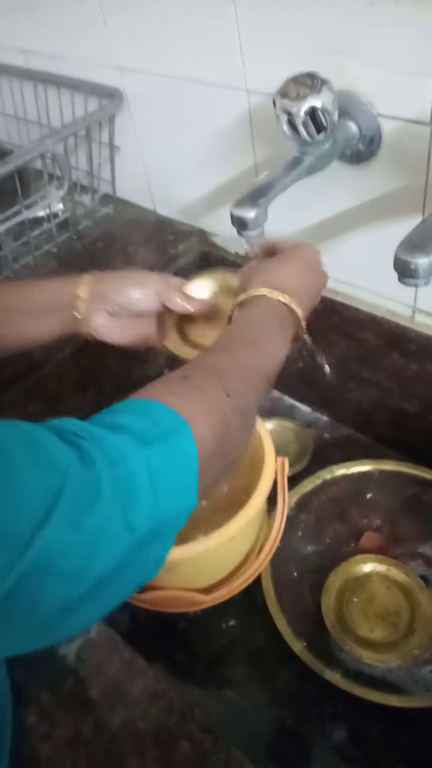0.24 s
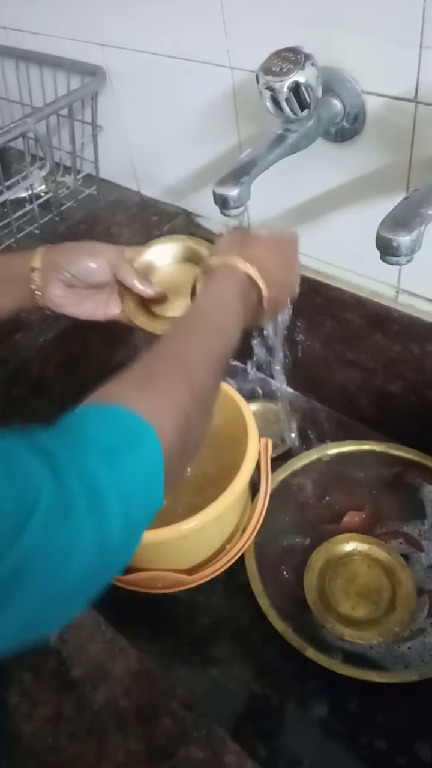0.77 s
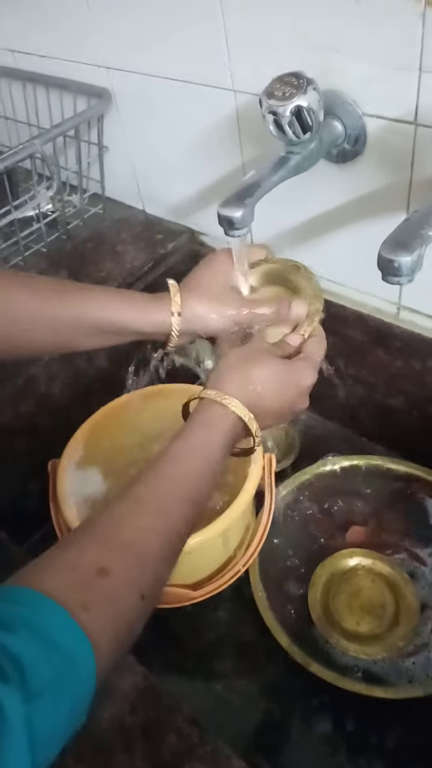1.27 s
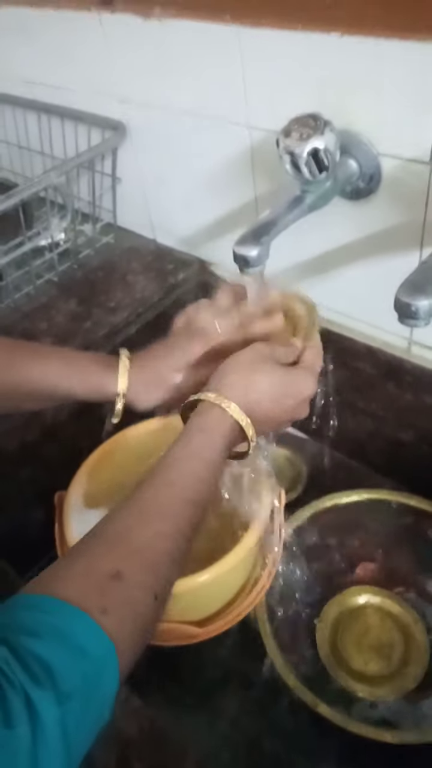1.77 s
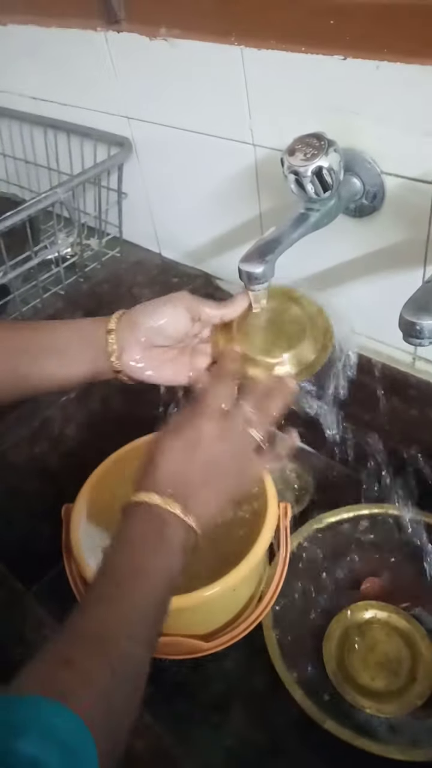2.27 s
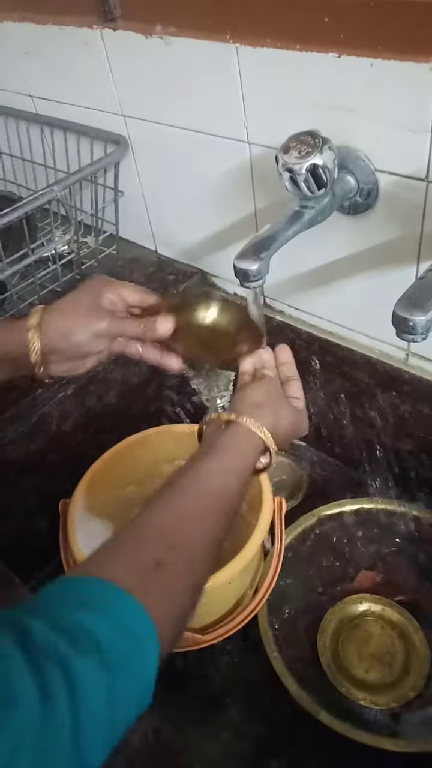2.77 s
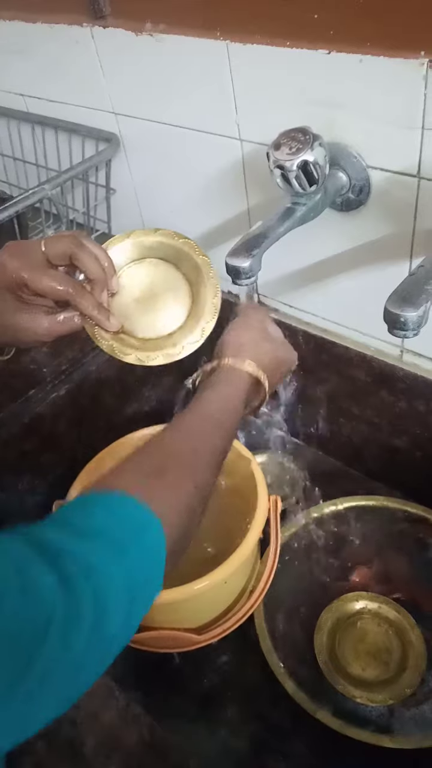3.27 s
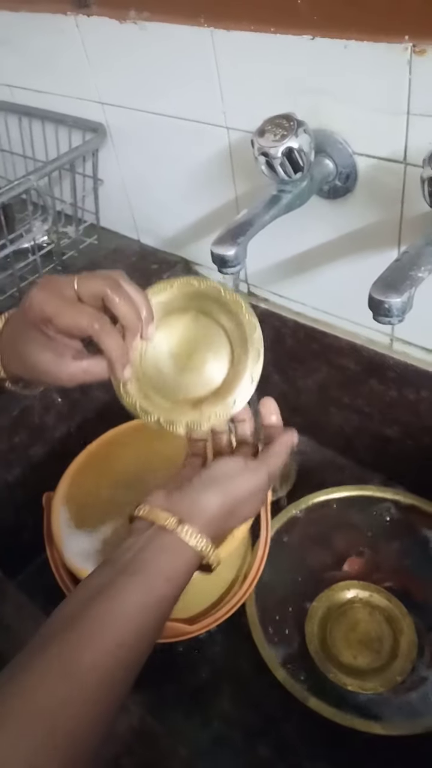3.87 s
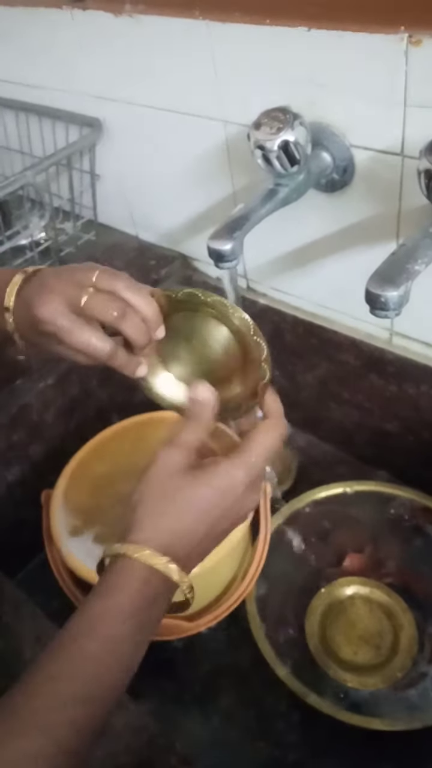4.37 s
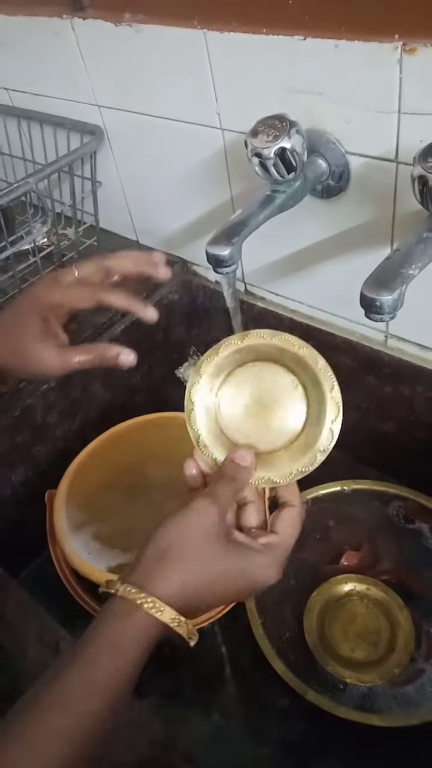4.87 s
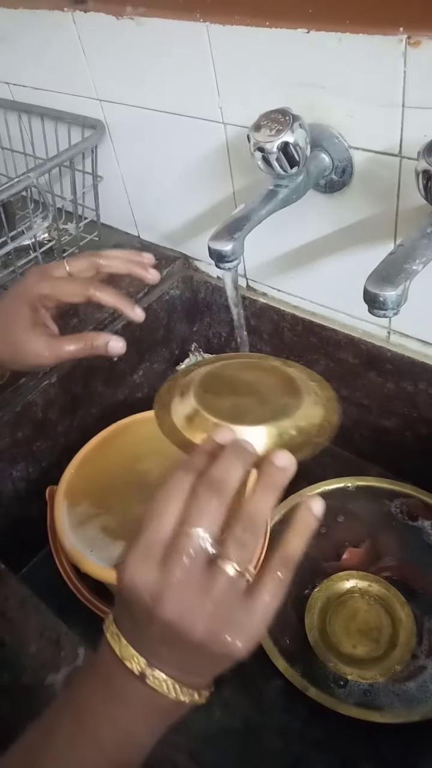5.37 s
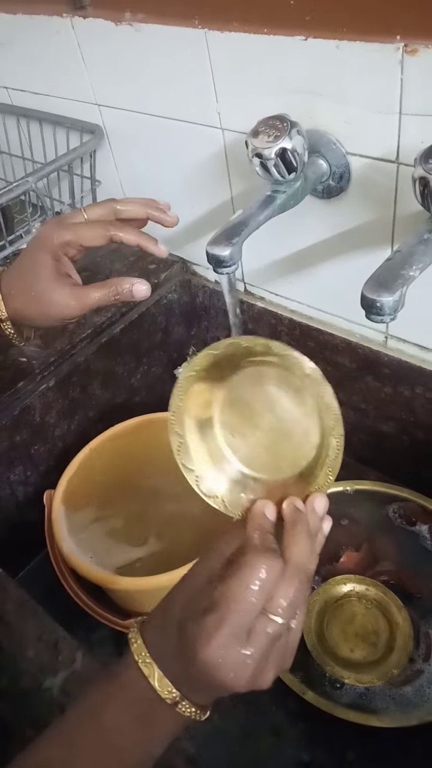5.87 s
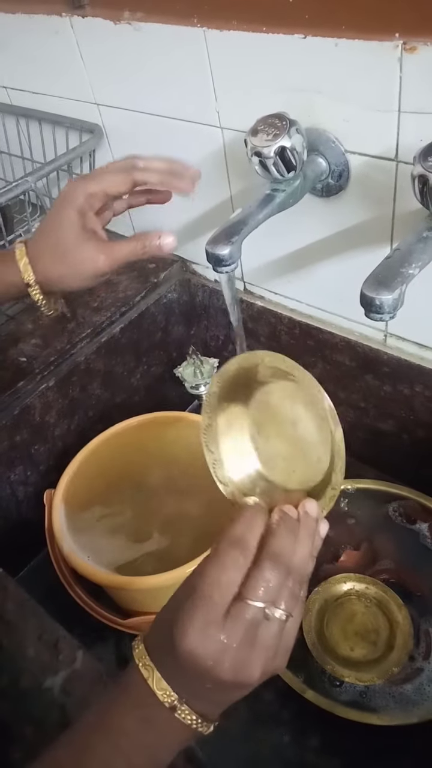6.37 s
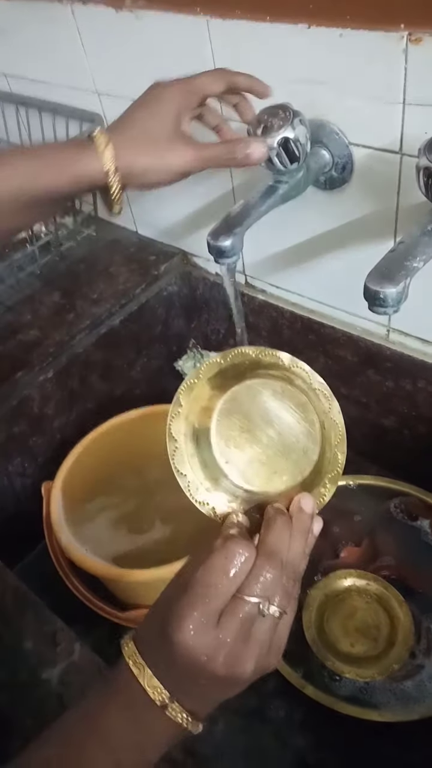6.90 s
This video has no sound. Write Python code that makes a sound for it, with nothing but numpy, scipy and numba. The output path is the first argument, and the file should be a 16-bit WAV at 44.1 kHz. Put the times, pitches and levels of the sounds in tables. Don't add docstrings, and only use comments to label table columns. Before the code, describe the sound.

Close in a small tiled kitchen, tap water runs over hands and a little brass plate into a stone sink. It opens with lively splashing; around 0.2-0.4 s come bubbly plops, a gush and a dull hollow knock. From 0.5 to 2 s the patter flutters, with crisp slaps near 0.6, 1.2, 1.5-1.6 and 1.9-2.1 s. Splashing thickens from 2.2 to 3.1 s, with spits and gurgling, then peaks around 3.4-3.7 s in hard, bright smacks and quick ringing bubbles. After 4 s the stream is thinner and mistier, with soft low booms near 4.5-4.7 s, splashes around 4.9-5.1 s, and a gargling splash at 5.6-6.1 s. Hollow thuds follow near 6.3, 6.55 and 6.8 s amid spitting spray. Water is still running at 7.1 s; a faint drain hum and short reverberation remain underneath.

```python
import sys
import numpy as np
from scipy import signal
from scipy.fft import rfft, irfft, next_fast_len
from scipy.io import wavfile
from numba import njit

SR = 44100
rng = np.random.default_rng(int(sys.argv[2]) if len(sys.argv) > 2 else 0)


def linear_from_db(decibels):
    return 10 ** (np.asarray(decibels, float) / 20)


def output_pcm(signal):
    pcm = np.clip(np.atleast_2d(signal).T, -1, 1) * 32767
    wavfile.write(sys.argv[1], SR, np.round(pcm).astype(np.int16))


N = 314865
TIME = np.arange(N) / SR


def noise(n=N):
    return rng.standard_normal(n)


def unit(x):
    return x / np.sqrt(np.mean(x ** 2))


def band(x, lo_hz, hi_hz):
    sos = signal.butter(3, [lo_hz, min(hi_hz, SR / 2.2)], "band", fs=SR, output="sos")
    return signal.sosfilt(sos, x)


def colour(x, points):
    hz, db = np.transpose(points)
    grid = np.log(np.fft.rfftfreq(len(x), 1 / SR) + 1)
    return irfft(rfft(x) * linear_from_db(np.interp(grid, np.log(hz), db)), len(x))


def decay(t, t60):
    return np.exp(-np.log(1000) * t / t60)


def fading(starts, fade_s):
    return signal.lfilter([1], [1, -np.exp(-1 / (fade_s * SR))], starts)


def impulses(table):
    out = np.zeros(N)
    s, db = np.transpose(table)
    out[(s * SR).astype(int)] = linear_from_db(db)
    return out


def jumps(s, db, fade_s):
    coarse = TIME[::32]
    age = coarse - s[:, None]
    sinking = (age >= 0) * db[:, None] * np.exp(-abs(age) / fade_s[:, None])
    return np.interp(TIME, coarse, np.sum(sinking, axis=0))


def swells(table, attack_s, release_s):
    out = 0
    for s, length, db in table:
        attack = np.clip((TIME - s) / attack_s, 0, 1)
        release = np.exp(-np.maximum(TIME - s - length, 0) / release_s)
        out = out + linear_from_db(db) * attack * release
    return out


def steady(modes, share):
    notes = 0
    for hz, width, db in modes:
        note = linear_from_db(db) * unit(band(noise(), hz - width / 2, hz + width / 2))
        envelope = abs(signal.hilbert(note, next_fast_len(N))[:N])
        notes = notes + note * linear_from_db(db * share) / (envelope + 0.095) ** share
    return unit(notes)


@njit
def rings(start, hz, t60, size, rise, swell, n):
    out = np.zeros(n)
    for k in range(len(start)):
        length = int(t60[k] * SR) + 2
        p = np.exp(2j * np.pi * hz[k] / SR - np.log(1000) / length)
        glide = np.exp(2j * np.pi * hz[k] * rise / SR / length)
        z, closed = size[k] + 0j, 1.
        first = int(start[k] * SR)
        for i in range(first, min(first + length, n)):
            closed *= np.exp(-hz[k] / (swell * SR))
            out[i] += z.imag * (1 - closed)
            z *= p
            p *= glide
    return out


# frequency in Hz, level in dB per Hz.
WATER = [(210, -21), (350, -9.5), (664, -13), (707, -13), (779, -11.5), (1360, -7.5), (1480, -6),
         (2670, -0.5), (5840, 7), (6750, 7), (8170, -11.5), (10900, -8.5), (16000, -21.5)]


def droplets(lo_hz, hi_hz, cycles, spread_db, hiss_db, gusty, count, wide=0.):
    pocket_db = 1.5
    when, pitch, rare = rng.random((count, 3)).T
    hz = lo_hz * (hi_hz / lo_hz) ** pitch
    size_db = -spread_db * np.log(1 - .98 * rare)
    drops = rings(when * N / SR, hz, cycles / hz, linear_from_db(size_db), 0.367, 0.22, N)
    edges, hiss = np.geomspace(lo_hz, hi_hz, num=7), 0
    broad = None
    for lo, hi in zip(edges, edges[1:]):
        starts = (rng.random(N) < 25 / SR) * rng.random(N)
        if broad is None:
            broad = fading(starts, 0.0075)
        splashes = wide * broad + (1 - wide) * fading(starts, .018)
        pockets = linear_from_db(pocket_db * unit(band(noise(), 2, 12)))
        hiss = hiss + band(noise() * (1 + gusty * splashes) * pockets, lo, hi)
    mix = unit(drops) + linear_from_db(hiss_db) * unit(hiss)
    return unit(band(colour(mix, WATER), lo_hz / 0.91, hi_hz * 0.89))


# time in seconds, flow in dB, pooling in dB, mist in dB relative to the flow.
FLOW = [(0.0, -38.5, -7.5, -10), (0.15, -48, -8, -6), (0.66, -47.5, -14, -9), (0.97, -44, -15, -4.5),
        (1.2, -47.5, -6, -7.5), (1.42, -51, -8, -4.5), (2.1, -41.5, -10.5, -8.5), (2.4, -45, -8, -5),
        (2.9, -42, -10.5, -7), (3.35, -43.5, -12, -8.5), (3.7, -43.5, -10, -10), (4.05, -50.5, -13.5, -3.5),
        (4.5, -48, -10.5, 0), (5.0, -44, -16.5, -5.5), (5.45, -48.5, -10.5, -1), (5.9, -48.5, -14, -1.5),
        (6.3, -48, -10, -7), (7.14, -51.5, -7, 0)]


def control(column):
    table = np.array(FLOW)
    return np.interp(TIME, table[:, 0], table[:, column])


# frequency in Hz, level in dB per Hz.
KITCHEN = [(15, 9), (25, 13), (48, 12), (397, 21.5), (515, 9), (784, -67), (1040, -34), (1430, 25),
           (3000, -32), (3900, -59), (6600, -120)]


def kitchen():
    return linear_from_db(-75.5) * unit(colour(noise(), KITCHEN))


# start in seconds, length in seconds, level in dB.
RUMBLES = [(.31, 0.089, -65), (2.413, .04, -76), (2.744, .05, -74), (2.85, .15, -77), (3.08, 0.053, -73),
           (4.5, 0.045, -82), (5.8, .06, -72), (4.15, 0.054, -72.5), (5.13, 0.02, -70), (6.0, 0.15, -59)]


def rumble():
    return unit(band(noise(), 82.0, 141)) * (linear_from_db(-89) + swells(RUMBLES, 0.013, 0.051))


# frequency in Hz, width in Hz, level in dB.
HOLLOW = [
    (219.4, 28.3, 6.5),
    (299, 28, -3.5),
]
# start in seconds, length in seconds, level in dB.
BOOMS = [(.305, 0.11, -58), (.5, 0.052, -69), (1.158, 0.025, -63), (1.53, 0.086, -76), (2.03, 0.073, -73),
         (2.6, 0.031, -65), (2.75, 0.027, -71), (3.18, 0.02, -68), (3.33, 0.067, -63.5),
         (3.64, 0.054, -67.5), (3.8, 0.058, -74), (3.94, 0.019, -68), (4.09, 0.16, -68.5),
         (4.487, 0.069, -58.5), (4.627, 0.021, -63), (4.706, 0.066, -59), (5.12, 0.034, -59.5),
         (5.636, 0.066, -65), (5.74, 0.14, -72), (5.92, 0.098, -65.5), (6.03, 0.15, -64),
         (5.04, 0.057, -73.5), (6.37, 0.059, -68), (2.3, 0.12, -79.5), (2.12, 0.065, -78),
         (6.312, 0.036, -56.5), (6.546, 0.05, -58.5), (6.79, 0.076, -60), (7.06, 0.045, -67.5)]


def boom():
    attack_s, release_s, tail_s = 0.0074, 0.0069, 0.1
    struck = swells(BOOMS, attack_s, release_s) + 0.2 * swells(BOOMS, attack_s, tail_s)
    return band(steady(HOLLOW, 1) * (linear_from_db(-104) + struck), 114, 550)


# start in seconds, length in seconds, level in dB.
KNOCKS = [(0.311, 0.047, -55), (1.054, .04, -73), (4.495, 0.089, -68.5), (6.313, 0.041, -59),
          (6.547, 0.048, -60), (6.635, 0.074, -70), (6.79, 0.061, -57)]


def knocks():
    return band(unit(band(noise(), 257, 375)) * swells(KNOCKS, 0.003, 0.025), 100, 1000)


# frequency in Hz, width in Hz, level in dB.
DRAIN = [
    (1031.6, 50.5, 4),
    (1234.5, 60, 1.5),
]
# time in seconds, glug jump in dB, drain jump in dB,
# fade in seconds.
GULPS = [(0.17, 5.5, 22, 0.14), (0.234, 10, -2, 0.92), (0.305, 6.5, 10, 1), (0.731, 10, 11, 0.14),
         (0.869, 2, 11.5, 0.062), (1.052, 10.5, 0, 0.16), (1.481, 7, -1, 0.48), (1.973, 9, -1, 0.11),
         (2.24, -1, 9, 0.29), (2.7, 4.5, 21, 0.078), (2.728, 11, 9, 0.1), (1.325, 5.5, -14, 0.066),
         (0.6, -12, -3.5, 0.2), (3.93, -3, -10, 0.1), (6.45, -9.5, -6, 0.37), (6.7, -2.5, -17, 0.1),
         (5.25, -6, -7, 0.12), (3.0, 6, -8, 0.086), (3.18, 8, -3, 0.24), (3.401, 7, 12, 0.21),
         (3.591, -4, 14, 0.047), (3.69, 10, 22, 0.089), (4.148, 6, 15, 0.36), (4.47, 3, 10, 0.97),
         (5.376, 5, 21.5, 0.084), (5.65, 7, 5, 0.73), (6.04, -0.5, 10.5, 0.25), (6.57, -1, 14, 0.37),
         (6.86, 2, 8, 0.13), (7.051, 5, 7, 0.069)]
# time in seconds, peak in dB, fade in seconds.
PUFFS = [(0.744, -48.5, 0.025), (0.827, -60, 0.044), (3.899, -66, 0.047), (4.078, -56.5, 0.023),
         (4.256, -59.5, 0.077), (4.504, -53, 0.04), (4.715, -53, 0.025), (5.459, -62, 0.033),
         (5.63, -58, 0.036), (6.642, -61.5, 0.052), (6.916, -56, 0.07), (7.034, -54.5, 0.06)]


def drain():
    s, _, drain_jump, fade = np.transpose(GULPS)
    level_db = -74.5 + 0.22 * (control(1) + 47) + jumps(s, drain_jump, fade)
    waver_db = 1.2 * unit(band(noise(), 6.7, 13.6))
    hum = steady(DRAIN, 0.38) * linear_from_db(level_db + waver_db)
    puffs = swells([(s, fade, db) for s, db, fade in PUFFS], 0.0028, 0.021)
    throat = unit(band(noise(), 500, 560))
    return hum + linear_from_db(-11) * throat * puffs


# start in seconds, length in seconds, level in dB.
GARGLES = [(0.31, 0.086, -60), (1.05, 0.075, -62), (1.16, 0.024, -60), (1.3, 0.23, -70.5),
           (2.4, 0.039, -63), (2.75, 0.14, -69), (3.05, 0.22, -59.5), (5.7, 0.36, -59.5),
           (6.07, 0.14, -63.5)]


def gargle():
    churn = droplets(298.7, 872, cycles=70, spread_db=6.5, hiss_db=4.0, gusty=0.89, count=900)
    return churn * swells(GARGLES, 0.048, 0.052)


def tiles(x, t60, wet_db):
    t = TIME[:SR // 2]
    tail = noise(len(t)) * decay(t, t60) * np.minimum(t / 0.00021, 1)
    tail = tail / np.sqrt(np.sum(tail ** 2))
    return x + linear_from_db(wet_db) * signal.fftconvolve(x, tail)[:N]


# time in seconds, peak in dB, pitch in Hz, decay time t60 in seconds.
BUBBLES = [(0.053, -41.5, 953, 0.18), (0.129, -39.5, 1490, 0.067), (0.141, -55, 298, 1),
           (0.236, -29.5, 705, 0.26), (0.308, -30, 405, 0.073), (0.373, -31.5, 761, 0.13),
           (0.491, -33.5, 1560, 0.081), (0.732, -38.5, 828, 0.55), (0.87, -42.5, 970, 0.12),
           (0.909, -39, 900, 0.15), (1.062, -43, 2000, 0.097), (1.165, -34.5, 413, 0.086),
           (1.2, -34, 1705, 0.33), (1.501, -42, 1063, 0.12), (1.995, -27, 2034, 0.08),
           (2.288, -34.5, 728, 0.13), (2.347, -36, 1575, 0.087), (2.453, -27, 1570, 0.036),
           (2.646, -39, 631, 0.32), (2.685, -38, 1390, 0.13), (3.014, -28, 1335, 0.23),
           (3.403, -21.5, 1860, 0.054), (3.523, -18.5, 1960, 0.026), (3.696, -32, 887, 0.077),
           (4.154, -36, 1016, 0.2), (4.663, -38, 515, 0.093), (5.38, -46, 1060, 0.12),
           (6.043, -25.5, 1384, 0.061), (0.78, -37, 1980, 0.083), (1.06, -36, 717, 0.086),
           (1.36, -41, 1375, 0.2), (1.472, -41, 1080, 0.05), (1.515, -39.5, 832, 0.16),
           (2.24, -41, 850, 0.12), (2.725, -44, 586, 0.21), (2.968, -42, 1300, 0.089),
           (4.118, -55, 1250, 0.17), (4.466, -47, 1284, 0.34), (6.042, -38, 1560, 0.17),
           (6.077, -39.5, 574, 0.21), (6.54, -61.5, 717, 0.36), (0.8, -42, 842, 0.6),
           (6.059, -42, 1460, 0.23), (0.174, -32, 2970, 0.03), (0.215, -31, 2700, 0.033),
           (7.075, -42.5, 704, 0.057)]


def bubbles():
    s, db, hz, t60 = np.transpose(BUBBLES)
    heave = unit(band(noise(), 6.2, 66))
    return rings(s, hz, t60, linear_from_db(db - 7.5), 0.073, 1.0, N) * (1 + 0.26 * heave)


# time in seconds, peak in dB.
SPITS = [(0.1665, -33), (0.2384, -32), (0.3082, -29), (0.5841, -36), (0.627, -31), (0.6539, -29.5),
         (0.731, -27), (0.837, -28.5), (1.1767, -27), (1.481, -34), (1.5697, -29), (1.5963, -39),
         (1.906, -34), (2.172, -32), (2.2383, -37), (2.33, -24), (2.4189, -33), (2.5122, -34),
         (2.5403, -24.5), (2.605, -25), (2.6394, -33), (2.8863, -26), (3.0879, -40), (3.4057, -40),
         (3.5833, -27.5), (3.6224, -19.5), (3.8244, -36), (3.94, -30.5), (4.1644, -36), (4.1984, -28),
         (4.26, -30), (4.3225, -31), (4.365, -34), (4.5396, -31), (4.8196, -31), (4.8703, -27),
         (4.9506, -34), (5.1013, -30.5), (5.3371, -29.5), (5.4939, -33), (5.5972, -32), (5.8885, -34),
         (5.9733, -39), (6.1, -31), (6.4438, -38), (6.5919, -33), (6.6099, -31), (6.6318, -25.5),
         (6.6628, -36), (6.8374, -29), (6.8518, -26), (6.875, -22), (6.954, -24), (7.0499, -31)]


def spits():
    starts = impulses(SPITS)
    puff = fading(starts, 0.0046) + .5 * fading(starts, 0.015)
    mist = unit(band(noise(), 8200, 14300)) * puff
    return linear_from_db(-16.0) * mist + linear_from_db(1.0) * band(starts, 3800, 13000)


# time in seconds, peak in dB, centre in Hz, decay time t60 in seconds.
SMACKS = [(0.173, -36, 2950, 0.089), (0.2145, -30.5, 2680, 0.13), (0.2374, -27, 3320, 0.092),
          (0.2728, -39, 3070, 0.1), (0.301, -26.5, 2680, 0.1), (0.5844, -24, 2940, 0.069),
          (0.02, -30.5, 2970, 0.25), (0.8584, -34, 3110, 0.12), (0.8996, -31, 2710, 0.11),
          (0.9938, -29, 2940, 0.11), (1.068, -39, 2010, 0.094), (1.197, -27, 1600, 0.14),
          (1.503, -24, 2960, 0.14), (1.608, -20.5, 3000, 0.11), (1.6538, -25, 2260, 0.13),
          (0.884, -21, 4200, 0.08), (0.821, -33, 4200, 0.062), (1.9709, -38, 2950, 0.088),
          (1.9937, -33, 2090, 0.12), (2.1015, -22, 3280, 0.15), (2.092, -27, 6500, 0.04),
          (2.448, -22, 5700, 0.056), (2.4546, -35, 1600, 0.15), (0.436, -26, 4340, 0.06),
          (2.7325, -30, 3190, 0.092), (5.629, -33, 3350, 0.1), (3.0885, -22, 3230, 0.18),
          (3.2373, -30, 2680, 0.14), (3.359, -31, 2380, 0.092), (3.405, -13, 2700, 0.06),
          (3.5249, -25.5, 2000, 0.18), (3.5938, -25, 1950, 0.1), (3.6477, -19, 2350, 0.072),
          (3.7557, -28.5, 2790, 0.24), (4.1594, -35.5, 2000, 0.083), (4.3954, -33, 2320, 0.1),
          (4.8697, -30, 3150, 0.14), (4.9617, -23.5, 3350, 0.13), (5.1005, -27.5, 2840, 0.1),
          (5.7071, -20.5, 2900, 0.13), (5.8351, -27, 2500, 0.17), (6.044, -38, 1380, 0.088),
          (6.4403, -31, 3100, 0.13), (6.662, -31, 2760, 0.073), (6.9223, -33, 3270, 0.11)]


def smacks():
    out = np.zeros(N)
    t = TIME[:SR // 4]
    span = 1.24
    for s, db, hz, t60 in SMACKS:
        burst = unit(band(noise(len(t)), hz / span, hz * span))
        shape = 0.51 * np.exp(-t / 0.0013) + 0.55 * decay(t, t60)
        i = int(s * SR)
        out[i:i + len(t)] += (linear_from_db(db - 11) * burst * shape)[:N - i]
    return out


# time in seconds, peak in dB, centre in Hz, decay time t60 in seconds.
SLAPS = [(0.2414, -22.5, 4030, 0.06), (0.5884, -25.5, 5830, 0.28), (0.621, -25, 5100, 0.27),
         (0.803, -27.5, 4600, 0.46), (0.8583, -29, 4260, 0.2), (1.1405, -23, 4750, 0.38),
         (1.504, -25, 4960, 0.28), (1.597, -23, 6600, 0.078), (1.609, -26.5, 2940, 0.1),
         (1.84, -23.5, 4940, 0.088), (1.91, -28, 3060, 0.1), (1.9738, -25, 3430, 0.33),
         (2.1023, -28, 6200, 0.53), (2.234, -20, 4500, 0.39), (2.4192, -29.5, 5700, 0.46),
         (2.54, -25, 4840, 0.22), (2.678, -22, 5430, 0.13), (2.731, -21, 4560, 0.1),
         (2.9703, -21.5, 5400, 0.17), (3.089, -23.5, 6150, 0.076), (3.406, -20, 5700, 0.17),
         (3.622, -20, 6000, 0.089), (3.6547, -23, 5730, 0.086), (4.9527, -28, 6200, 0.21),
         (5.672, -25.5, 5300, 0.14), (5.7068, -26.5, 4500, 0.4), (6.442, -27, 5030, 0.34),
         (6.6166, -28, 5360, 0.32), (6.6628, -27, 6360, 0.25), (6.8533, -24, 6100, 0.5)]
# time in seconds, peak in dB, centre in Hz.
FLICKS = [(0.3097, -25.5, 6000), (0.3654, -29.5, 5430), (0.519, -35, 5730), (0.7818, -26.5, 6400),
          (0.899, -26, 2730), (0.993, -26, 5430), (0.654, -29, 4300), (1.482, -26.5, 5440),
          (1.5641, -25.5, 4400), (1.658, -30.5, 3420), (1.818, -28, 5000), (1.8688, -28, 5040),
          (2.214, -28, 5070), (2.6387, -26, 6700), (2.793, -28, 5940), (2.816, -25, 6300),
          (3.356, -28, 5700), (3.496, -24, 4100), (3.7356, -33, 4500), (3.758, -30, 2450),
          (0.04, -42, 5400), (0.954, -33, 4470), (1.359, -31, 5600), (2.513, -33, 5270), (3.255, -30, 4800),
          (4.123, -34.5, 6060), (5.9737, -34, 5960), (6.92, -34, 4140), (7.01, -34.5, 3830),
          (7.105, -31, 4470)]
# time in seconds, peak in dB, centre in Hz.
LUMPS = [(4.259, -29.5, 5600), (4.366, -29.5, 5360), (4.394, -32.5, 5800), (4.4506, -27, 5400),
         (4.491, -31.5, 5260), (4.6017, -28.5, 6000), (5.509, -35, 6500), (4.8204, -36, 5850),
         (4.8702, -30, 4640), (5.89, -35, 6900), (5.494, -32.5, 5940), (5.8344, -39, 4840),
         (6.0191, -31.5, 5000), (6.3, -36, 4770), (6.412, -29, 6250), (6.84, -30, 6140), (7.074, -30, 6000)]


def slaps():
    out = np.zeros(N)
    t = TIME[:SR // 3]
    flicks = [(*row, 0.14) for row in FLICKS]
    lumps = [(*row, 0.22) for row in LUMPS]
    for s, db, hz, t60 in SLAPS + flicks + lumps:
        crackle_db = 1.6 * noise(len(t) // 60 + 1).repeat(60)[:len(t)]
        splinters = noise(len(t)) * linear_from_db(crackle_db)
        core = unit(band(splinters, hz / 1.17, hz * 1.12))
        skirt = unit(band(splinters, hz / 1.434, min(hz * 2.1, 6900)))
        burst = core + linear_from_db(0.5) * skirt
        shape = 0.42 * np.exp(-t / 0.0041) + 0.37 * decay(t, t60)
        crack = band(1. * (t == 0), hz / 1.08, hz * 1.13)
        hit = linear_from_db(db - 9.5) * burst * shape + linear_from_db(db - 6.0) * crack / crack.max()
        i = int(s * SR)
        out[i:i + len(t)] += hit[:N - i]
    return out


# time in seconds, patter jump in dB, slosh jump in dB, fade in seconds.
GUSHES = [(0.239, 5.5, 12.5, 1), (0.592, 7, 10, 0.078), (0.782, 1.5, 5, 0.57), (1.066, 5, 6.5, 0.24),
          (1.499, 5.5, 13, 0.088), (1.601, 5, 3.5, 0.23), (1.91, 6, 14.5, 0.1), (2.104, 4.5, 3, 0.13),
          (2.233, -6, -5, 0.088), (2.421, 4.5, 4, 0.05), (2.592, 7.5, 9, 0.04), (2.682, -2, 1.5, 0.66),
          (3.089, 8, 5, 0.033), (3.402, 10, 17.5, 0.16), (3.645, 12.5, 11, 0.061), (4.151, 6, 8, 0.22),
          (4.39, 4.5, 13, 0.11), (4.87, 7.5, 12.5, 0.055), (4.95, 3.5, 5, 0.093), (2.731, 6.5, 9, 0.15),
          (6.662, -3, 6.5, 0.062), (6.92, -2, -3, 0.031), (7.01, -3.5, -7, 0.049), (5.101, 4.5, 11.5, 0.29),
          (5.535, -2, 10, 0.07), (5.6, 4, 3.5, 0.21), (5.707, 3.5, 5, 0.25), (5.834, 5.5, 14, 0.039),
          (6.61, 6, 3.5, 0.18), (6.852, 7.5, 4.5, 0.2), (6.14, 2, -9, 0.061), (6.3, 4, -10, 0.1),
          (6.5, 3.5, -5.5, 0.1), (6.72, -3.5, -5, 0.15)]
# middle in seconds, length in seconds, depth in dB.
LULLS = [(0.564, 0.094, 1.5), (1.771, 0.087, 2.5), (2.405, 0.013, 4), (4.744, 0.12, 3), (4.796, 0.055, 7),
         (5.337, 0.15, 3), (5.569, 0.076, 4.5), (2.4, 0.015, 3), (0.774, 0.015, 3), (6.5, 0.038, 3)]


def stream():
    lull_db = sum(db * np.exp(-(2 * (TIME - middle) / length) ** 2) for middle, length, db in LULLS)
    flow_db, pool_db, mist_db = control(1), control(2), control(3)
    s, patter_jump, slosh_jump, fade = np.transpose(GUSHES)
    patter_db = flow_db + jumps(s, patter_jump, fade) - lull_db
    slosh_db = flow_db + pool_db - 2.5 + jumps(s, slosh_jump, fade) - 5 * lull_db
    spray_db = patter_db + mist_db - lull_db
    s, glug_jump, _, fade = np.transpose(GULPS)
    glug_db = flow_db + 1.218 * pool_db - 0.5 + jumps(s, glug_jump, fade) - lull_db

    glug = droplets(414.4, 2067, cycles=58, spread_db=1.5, hiss_db=2.5, gusty=7.4, count=1800)
    slosh = droplets(1839, 3724, cycles=33, spread_db=-2.5, hiss_db=4.0, gusty=1.75, count=2500)
    patter = droplets(3116, 7530, cycles=48, spread_db=4.5, hiss_db=2.5, gusty=2.6, count=7000, wide=0.21)
    spray = droplets(7110, 21500, cycles=32, spread_db=3.0, hiss_db=5.0, gusty=7.3, count=7000, wide=.75)

    deep_hz, heavy_hz = 930, 4640
    glug = band(glug, deep_hz, 2880) + linear_from_db(7 + 0.69 * pool_db) * band(glug, 511, deep_hz)
    patter = band(patter, heavy_hz, 7700) + linear_from_db(-0.89 * lull_db) * band(patter, 2250, heavy_hz)
    landings = impulses([row[:2] for row in SLAPS + FLICKS + LUMPS])
    spray = spray * (1 + linear_from_db(20) * fading(landings, 0.0019))

    low = linear_from_db(glug_db - 4.0) * glug + linear_from_db(slosh_db + 0.23) * slosh
    return low + linear_from_db(spray_db - 2.0) * spray + linear_from_db(patter_db - 1.98) * patter


def scene():
    sink = boom() + knocks() + rumble() + drain() + gargle()
    near = bubbles() + spits() + smacks() + slaps() + stream()
    return (kitchen() + sink + tiles(near, t60=0.48, wet_db=-8.5))[None]


def band_limit(x):
    return signal.sosfilt(signal.butter(12, 16610, fs=SR, output="sos"), x)


def record(dry):
    low_pass = signal.ellip(10, .2, 60, 15900, fs=SR, output="sos")
    mix = signal.sosfilt(low_pass, dry) - 0.000068
    return band_limit(mix)


dry = scene()
out = record(dry)
output_pcm(out)
```